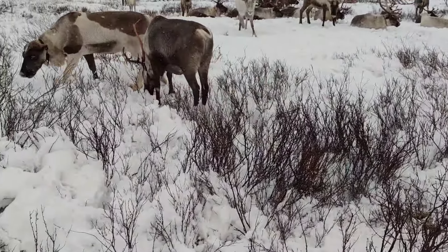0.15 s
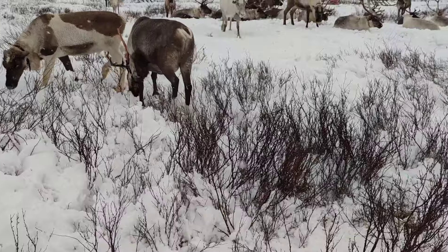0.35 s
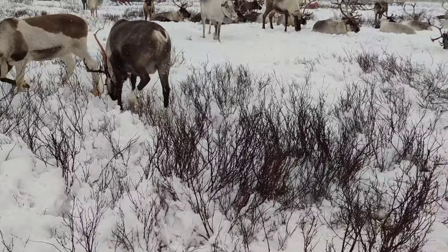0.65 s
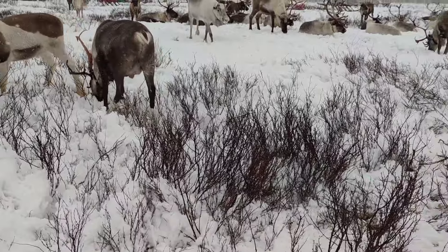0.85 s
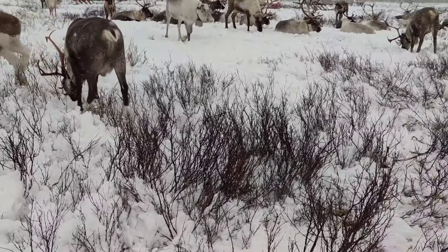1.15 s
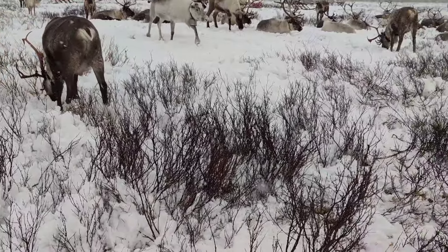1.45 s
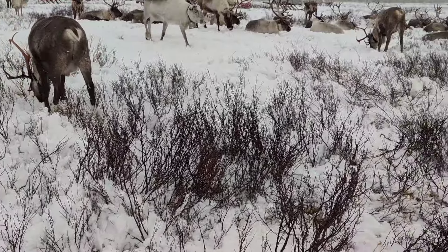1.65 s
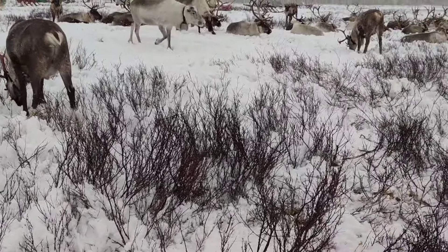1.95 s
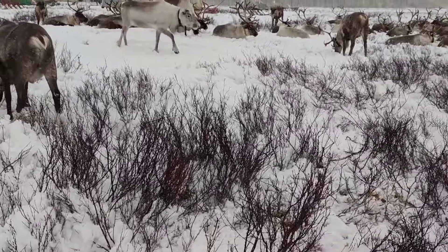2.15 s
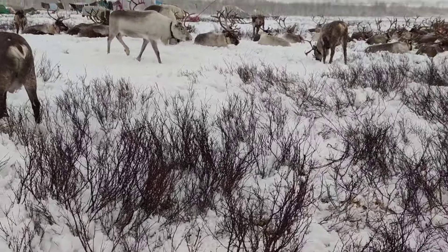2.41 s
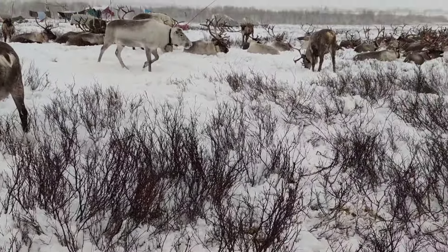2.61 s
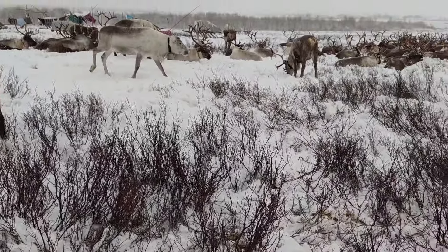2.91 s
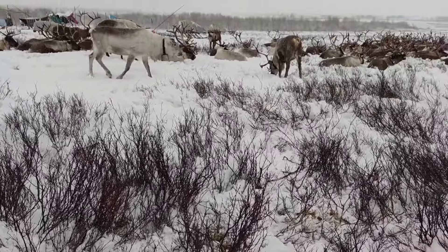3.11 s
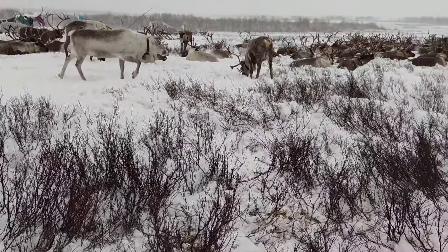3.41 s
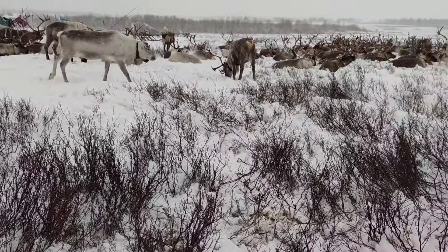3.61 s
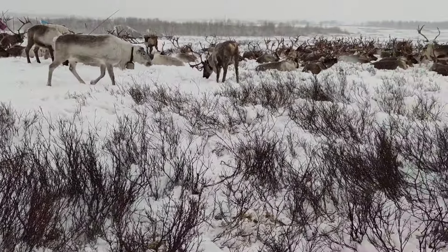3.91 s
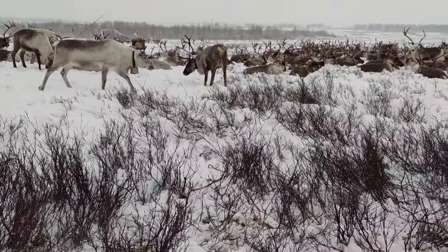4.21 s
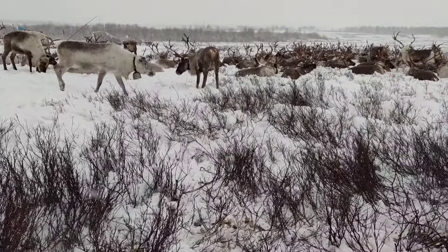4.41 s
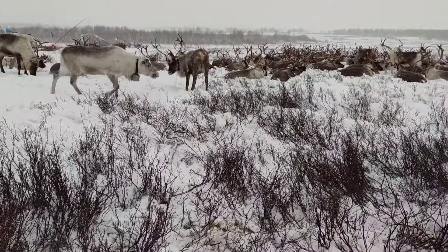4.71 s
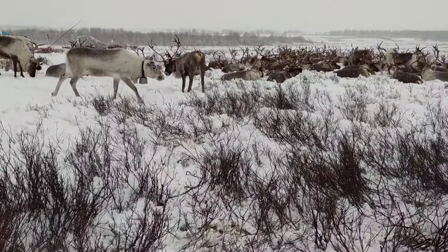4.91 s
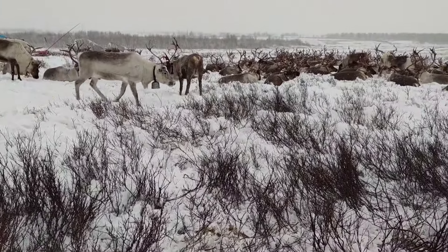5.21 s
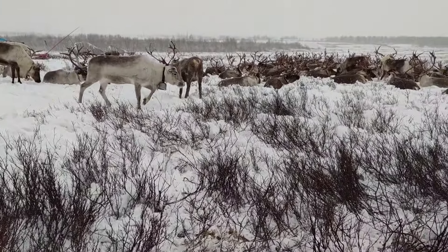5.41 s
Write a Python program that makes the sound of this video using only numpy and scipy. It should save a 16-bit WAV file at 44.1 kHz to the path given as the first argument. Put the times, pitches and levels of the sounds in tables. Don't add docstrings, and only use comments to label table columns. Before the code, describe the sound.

Small animal bells tinkle and a larger bell clanks step by step as wind rumbles into the microphone over crunching snow.

```python
import sys
import numpy as np
from scipy import signal
from scipy.fft import rfft, irfft, next_fast_len
from scipy.io import wavfile
from scipy.ndimage import uniform_filter1d, map_coordinates

SR = 44100
rng = np.random.default_rng(int(sys.argv[2]) if len(sys.argv) > 2 else 0)


def master(y):
    cut = np.clip(np.atleast_2d(y).T, -1, 1)
    pcm = np.round(cut * 32767)
    wavfile.write(sys.argv[1], SR, pcm.astype(np.int16))


def attenuation_scalar(level_db):
    decades = np.asarray(level_db, float) / 20
    return 10 ** decades


N = 244755


def unit(x):
    return x / np.sqrt(np.mean(x ** 2, axis=-1, keepdims=True) + 1e-20)


def curves(rows):
    s, *cols = np.transpose(rows)
    return [np.interp(np.arange(N) / SR, s, c) for c in cols]


def wobble(rate):
    knots = rng.standard_normal((2, 1200))
    coarse = np.arange(0, N + 32, 32)
    smooth = [map_coordinates(k, [coarse * rate / SR]) for k in knots]
    return np.array([np.interp(np.arange(N), coarse, c) for c in smooth])


def coloured(x, points):
    m = 16384
    hz, db = np.transpose(points)
    gain = attenuation_scalar(np.interp(np.log(np.fft.rfftfreq(m, 1 / SR) + 1), np.log(hz), db))
    cepstrum = irfft(np.log(gain + 1e-7), m)
    cepstrum[1:m // 2] *= 2
    cepstrum[m // 2 + 1:] = 0
    response = irfft(np.exp(rfft(cepstrum)), m)
    size = next_fast_len(N + m)
    return irfft(rfft(x, size) * rfft(response, size), size)[..., :N]


def ports(mid_db, pan_db):
    right = 2 * attenuation_scalar(mid_db) / np.sqrt(1 + attenuation_scalar(2 * pan_db))
    return np.array([right * attenuation_scalar(pan_db), right])


def bursts(times, gains, life, shared):
    out = np.zeros((2, N + 2048))
    t = np.arange(2048) / SR
    shape = t / life * np.exp(1 - t / life)
    for s, gain in zip(times, gains.T):
        noise = rng.standard_normal((2, 2048))
        noise[0] = shared * noise[1] + np.sqrt(1 - shared ** 2) * noise[0]
        start = round(s * SR)
        out[:, start:start + 2048] += gain[:, None] * noise * shape
    return out[:, :N]


def bell(blows, pitches, modes, lead_us, sway_db, scatter_db=0):
    out = np.zeros((2, N))
    starts = [round(row[0] * SR) for row in blows] + [N]
    for k, (s, *level_db) in enumerate(blows):
        start = starts[k]
        luck = rng.standard_normal((len(modes), 3))
        for j, (hz, (db, t60, pan_db)) in enumerate(zip(pitches, modes)):
            t = np.arange(min(starts[k + 1] - start, int(t60 * SR))) / SR
            start_db = level_db[-1 if scatter_db else j] + db + scatter_db * luck[j, 0]
            decay = np.log(1000) / t60
            ring = np.exp((2j * np.pi * hz - decay) * t + 2j * luck[j, 1]) * attenuation_scalar(start_db)
            flicker = np.interp(t * 90, np.arange(40), rng.standard_normal(40))
            ring *= np.exp((0.21 + 0.25j) * flicker * hz / 8000)
            ring *= np.minimum(t / 0.0015, 1)
            early = np.exp(2j * np.pi * hz * lead_us[start] * 1e-6)
            left = attenuation_scalar(pan_db + sway_db * luck[j, 2]) * early
            out[:, start:start + len(t)] += [(left * ring).imag, ring.imag]
    return out


def split(db, place):
    angle = np.radians(place)
    return db + 20 * np.log10(np.abs([np.cos(angle), np.sin(angle)]) + 1e-3)


# t/s, strength level/dB, edge-on level/dB as it turns,
# place on the rim/degrees, hum level/dB
LARGE_BLOWS = [(0, -101, -7, 45, -47.5), (0.6404, -50, -18, 14, -57), (0.9916, -50.5, -9.5, 51, -62),
               (1.3397, -42, -35, 15, -63), (1.757, -39, -17, 56, -56.5), (2.104, -40.5, -5.5, 16, -61.5),
               (2.3, -91, -28, 55, -71), (2.521, -59, 6.5, 120, -62), (2.8014, -33.5, 2.5, 66, -59),
               (3.209, -53, -14.5, 76, -61.5), (3.5103, -41.5, -3.5, 18, -61.5),
               (3.887, -41.5, -0.5, 49, -64), (4.167, -42.5, 3, 71, -51.5), (4.58, -60, -9, 44, -60.5),
               (4.9001, -57, 6, 30, -53.5)]
# level/dB at a usual blow, share of strength, share of edge-on,
# drift/(dB per s) as the animal walks across
MODE_ANSWER = [
    (-46.5, 0.998, 0.97, 3),
    (-67.5, 0.74, 0.017, 4),
    (-57, 0.261, 0.32, 0),
    (-57.5, 0.51, 1, -3.5),
    (-44, 0.43, 0.08, 2.5),
    (-46, 0.99, 0.18, 3.5),
    (-40, 0.51, 0.44, -3),
]
# level/dB at f/Hz 4140, 6180, 6320, 6680, 6860
PAIR_MODE_BEAM = [(0, 0, 0, 0, 0), (-15, 7, 4, -4, 0), (0, -5, -3, -6, 4), (-3, 2, 1, 0, 4),
                  (1, -10, -7, 3, 0), (-12, -3, -3, 3, 3), (0, 0, 0, 0, 0), (-2, 5, 14, -7, 3),
                  (-12, 4, -3, -4, 0), (-6, -3, -4, 6, 0), (-2, 4, 7, -2, 0), (-11, 1, 1, -9, -3),
                  (4, -4, 4, 9, 1), (-10, -4, 5, -3, 5), (-10, -11, -7, -8, -7)]
# level/dB at f/Hz 4240, 4260, 8580, 8760
TWIN_MODE_BEAM = [(0, 0, 0, -6), (1, 1, 15, -13), (-4, -3, 25, -3), (1, 6, 7, -6), (1, 12, -1, -7),
                  (-21, -3.5, 10, -15), (0, 0, 0, 0), (-8, -13, -2, -10), (-7.5, -14, 11, -2),
                  (1, -2, -7, 0), (-11, -9.5, 6, -14), (2.5, -6, -4, -16), (-11, -3, 8, -12),
                  (-11, -4, -2, -6), (-5, -11, 10, -16)]
TOP_CLUSTER_BEAM = [-5, -4, 3.5, -1, 3.5, 1, 3, 2.5, -1.5, -1, 5.5, -5.5, 1.5, -5, -6]


def blow_levels():
    usual_db, abreast_s = -47, 2.8
    node_floor = 0.088
    s, strength, edge, place, hum = np.transpose(LARGE_BLOWS)
    answers = []
    for db, by_strength, by_edge, by_time in MODE_ANSWER:
        change_db = by_strength * (strength - usual_db) + by_edge * edge + by_time * (s - abreast_s)
        answers.append(db + change_db)
    second, third, top, *single, pair = answers
    third = third + 20 * np.log10(np.abs(np.cos(np.radians(2 * place))) + node_floor)
    lower, _, middle, _ = np.transpose(TWIN_MODE_BEAM)
    pairs = np.array([*single, *split(pair, place)]) + np.transpose(PAIR_MODE_BEAM)
    singles = [s, hum, strength, second + lower, third + middle, top + TOP_CLUSTER_BEAM]
    return np.transpose(singles), np.transpose([s, *pairs])


# t/s, left port's lead/microseconds
BELL_WALK = [
    (0, 1),
    (5.55, 73),
]
MAIN_HZ = [866, 2340, 4243, 8583]
# level/dB, time to fall 60 dB/s, left-right level/dB
MAIN_MODES = [(2, 2.33, -5), (3, 0.45, -8), (8.5, .11, -3), (0, 0.2, 6)]
PAIR_HZ = [4152, 6183, 6319, 6684, 6862]
# level/dB, time to fall 60 dB/s, left-right level/dB
PAIR_MODES = [(15.3, 0.09, -5), (2.5, 0.18, -16), (1.7, 0.25, -12), (4.7, 0.19, -8), (2, 0.22, -10.5)]
TOP_HZ = [9860, 10225, 12575, 11005, 12905, 11365, 11527, 11770, 12968, 13843, 14176]
# level/dB, time to fall 60 dB/s, left-right level/dB
TOP_MODES = [(-22, 0.1, -8), (-3, 0.063, -11), (-12, 0.09, -21), (8, .07, -17), (-8, 0.09, -24),
             (5, 0.11, -22), (-6, 0.15, -22), (-14, .07, -20), (3, 0.094, -16), (-10, .06, -13),
             (6, .05, -20)]


def large_bell():
    lead_us, = curves(BELL_WALK)
    blows, pairs = blow_levels()
    ringing = bell(blows, MAIN_HZ, MAIN_MODES, lead_us, sway_db=2.2)
    ringing += bell(pairs, PAIR_HZ, PAIR_MODES, lead_us, sway_db=3.2)
    return ringing + bell(blows, TOP_HZ, TOP_MODES, lead_us, sway_db=4.2, scatter_db=4)


TWIN_MODE_HZ = [4268, 8748, 10695, 11216]
# level/dB, time to fall 60 dB/s, left-right level/dB
TWIN_MODES = [(11, 0.094, -1), (7.5, 0.11, -0.5), (11.5, 0.13, -17), (-25, 0.16, -26)]


def twins():
    s, _, _, second, third, top = blow_levels()[0].T
    lower, upper, _, high = np.transpose(TWIN_MODE_BEAM)
    levels = [second - lower + upper, top + high, top + high, 0.5 * third]
    rows = np.transpose([s, *levels])
    return bell(rows, TWIN_MODE_HZ, TWIN_MODES, curves(BELL_WALK)[0], sway_db=-8)


def clank():
    s, top_db = blow_levels()[0].T[[0, -1]]
    gains = attenuation_scalar(top_db + np.array([[2.5], [6]]))
    rattle = bursts(s, gains, life=0.0022, shared=0.46)
    return coloured(rattle, [(1500, 7.4), (4000, 12.8), (9000, 5.3), (15000, 3)])


# t/s, strength level/dB, place on the rim/degrees, top hardness level/dB
SMALL_BLOWS = [(0.031, -54.5, 59, -12), (0.0995, -42.5, 10, -7), (0.363, -73, 44, -8),
               (0.4321, -51, 42, -13), (0.5266, -46.5, 47, -14), (0.599, -52.5, 100, -4.5),
               (1.37, -55.5, 38, -13), (1.474, -51, 39, -15), (1.5495, -46.5, 43, -20), (1.639, -59, 6, -9),
               (1.696, -66, 19.6, -8.5), (1.9257, -42.5, 4.7, -18), (1.982, -44, 12.2, -19),
               (2.099, -74, 45, 0), (3.7832, -51.5, 9.4, -13), (3.9002, -45, 77, -9),
               (4.0854, -55.5, 36, -9), (4.2748, -48, 4, -19.5), (4.4834, -50, 100, -6),
               (4.647, -52, 56, -14), (5.1634, -49, 18, -11), (5.197, -51, 23, -13),
               (5.3243, -44.5, 40, -16), (5.411, -36.5, 4.9, -27)]
# level/dB, place on the rim/degrees
SMALL_HUMS = [(-62, 38), (-56.5, 18), (-70, 27), (-65, 5), (-65, 15), (-62.5, 15), (-68, 75), (-58.5, 21),
              (-63.5, 68), (-64, 10), (-67, 30), (-57.5, 18), (-62.5, 7), (-97, 45), (-77, 35), (-61, 65),
              (-69, 11), (-78, 25), (-69, 20), (-69, 32), (-72, 85), (-74, 63), (-68, 80), (-65, 86)]


def tinkle_levels():
    s, strength, place, hard = np.transpose(SMALL_BLOWS)
    hum_db, hum_place = np.transpose(SMALL_HUMS)
    return np.transpose([s, *split(strength, place), *split(hum_db, hum_place), strength + hard])


SMALL_MAIN_HZ = [7651, 7682, 2986, 2937]
# level/dB, time to fall 60 dB/s, left-right level/dB
SMALL_MODES = [(-2.5, 0.34, 2), (-3.5, 0.39, 3), (1, 0.56, -9), (0, 1.1, -12)]
SMALL_CLUSTER_HZ = [7870, 11447, 11781, 11915, 12085]
# level/dB, time to fall 60 dB/s, left-right level/dB
SMALL_CLUSTER = [(-18, 0.38, -7), (-1, 0.19, -22), (2, 0.22, -22), (-7, 0.17, -12), (1.5, 0.18, -30)]


def small_bell():
    tinkles, still = tinkle_levels(), np.zeros(N)
    ringing = bell(tinkles, SMALL_MAIN_HZ, SMALL_MODES, still, sway_db=5)
    return ringing + bell(tinkles, SMALL_CLUSTER_HZ, SMALL_CLUSTER, still, sway_db=-4, scatter_db=2.5)


def cracks(s, db, low_db, high_db, pan_db):
    low = bursts(s, ports(db + low_db + 7, 0.5 * pan_db), life=0.00066, shared=0.14)
    middle = bursts(s, ports(db + 6.5, pan_db + 6), life=0.00075, shared=0.16)
    high = bursts(s, ports(db + high_db + 6.5, pan_db), life=0.00053, shared=0.67)
    low = coloured(low, [(300, 3), (1000, -1.5), (2400, 4.5), (4000, -2.5), (15000, -90)])
    middle = coloured(middle, [(1200, -10.5), (3300, -9), (4500, -4.5), (8000, -1), (11000, -28)])
    high = coloured(high, [(4000, -38), (9000, 0.5), (15000, -2.5)])
    return low + middle + high


# level/dB over the top cluster, dull level/dB, bright level/dB,
# left-right level/dB
CLAPPER_TICK = (8, -1.5, -14, -19)
# t/s, peak level/dB, bright level/dB, left-right level/dB
TWIG_SNAPS = [(0.1206, -40, -24, -13), (0.56, -40.5, -16.5, -12.5), (0.7, -44, -11, -2),
              (1.8523, -46, -15, 1), (2.301, -40.5, -19, -12), (2.326, -50, -15, -13),
              (2.8604, -45, -14, -11.5), (2.9094, -45.5, -1, -21), (2.9287, -47, -4.5, -17),
              (3.3438, -42.5, -13, -9), (3.4111, -47, -13, -11), (3.483, -45, -7, -8),
              (4.013, -48.5, -15, -16), (4.244, -45, -24, -10), (5.317, -40.5, -23, -17)]
# t/s, peak level/dB, bright level/dB, left-right level/dB
CRUST_BREAKS = [(0.1019, -49, -9, -11.5), (0.14, -40.5, -27, -22), (0.297, -60, -14, 10),
                (0.3159, -46.5, -21.5, 6), (0.858, -59, 0, -14), (0.9527, -45.5, -6, -8),
                (2.1893, -50, -6, -19), (2.36, -50, -29, -7), (2.4082, -42.5, -1, -10),
                (2.4718, -41.5, -12, 12), (3.296, -50.5, -10, 3), (3.367, -42.5, -15, -20),
                (3.441, -45, -13, 12), (3.577, -46.5, -16.5, -18), (4.227, -46, -10, -14),
                (4.4133, -48, -28, -21), (4.4253, -41, -14, -24), (4.4742, -68.5, -4, -22),
                (5.5346, -56, -20, -19)]


def snaps():
    tick_lead_s, twig_dull_db, crust_dull_db = 0.002, -36, -1
    over_db, *parts = CLAPPER_TICK
    ticks = [(abs(row[0] - tick_lead_s), row[-1] + over_db, *parts) for row in blow_levels()[0]]
    twigs = [(s, db, twig_dull_db, high, pan) for s, db, high, pan in TWIG_SNAPS]
    crust = [(s, db, crust_dull_db, high, pan) for s, db, high, pan in CRUST_BREAKS]
    return cracks(*np.transpose(ticks + twigs + crust))


# t/s, peak level/dB, dull level/dB, bright level/dB,
# left-right level/dB
SMALL_SPLINTERS = [(0.36, -44.5, -11, -17.5, -8), (0.414, -46, -23, -20, -11), (0.4424, -43, -7, -12, 0),
                   (0.8774, -49, -15, -16, -14), (0.9226, -45.5, -13, -7, -19),
                   (1.3254, -56, -22, -19, -14.5), (1.6702, -48, -5, -19, 0), (1.69, -52.5, 3, -13, -1),
                   (2.3487, -44, -13, -23, -11.0), (2.4202, -45, -6, -19, -1),
                   (2.484, -44, -13, -16, -14.5), (2.4947, -47, -5, -5, -5), (2.6683, -46.5, 0, -10, -8),
                   (2.6898, -45.5, -8, -22, -12.0), (2.9566, -43, -19, -9, -2), (3.1185, -57, -7, -5, -7),
                   (3.308, -44.5, -8, -6.5, -9), (3.4307, -51, -3.5, -18, -10), (3.6775, -56, 0, -16, 0),
                   (3.845, -49, -19.5, -2, -14), (4.0422, -47.5, -5, -23, -12.5),
                   (4.2764, -45, -7, -14, -4), (4.29, -45, -1, -18, -4), (4.333, -49, 3, -15, 4),
                   (4.5095, -46.5, -8, 0, -22), (4.6828, -56, -12, -18.5, -15), (4.9, -35, -25, -26, -13),
                   (5.18, -52, -19, -2, 2), (5.241, -49, -16, -27, -8), (5.4096, -40, -11, -23, -8),
                   (5.4685, -40.5, -4, -21, -5), (5.5004, -44.5, 1.5, -30, -5)]
# peak, dull, bright and left-right level/dB
SPLINTER_OFFSETS = [-5, 2, 0, 2]


def splinters():
    s, *parts = np.transpose(SMALL_SPLINTERS)
    parts = parts + np.array(SPLINTER_OFFSETS)[:, None]
    return through_ports(cracks(s, *parts))


def grains(rate, spread_db, life, colour):
    chance, size, noise = rng.random(N), rng.exponential(size=N), rng.standard_normal((2, N))
    starts = (chance < rate / SR) * attenuation_scalar(np.minimum(spread_db * size, 3 * spread_db))
    envelope = signal.lfilter([1], [1, -np.exp(-1 / (life * SR))], starts)
    return unit(coloured(envelope * (0.083 * noise[1] + 4.3 * noise), colour))


# t/s, level/dB
SNOW_CRUNCH = [(0.0, -48), (0.07, -105), (0.14, -72.5), (0.67, -68), (1.18, -78), (1.81, -67),
               (2.21, -71.5), (2.55, -65.5), (2.76, -73), (2.9, -65.5), (3.81, -73), (4.11, -71.5),
               (4.19, -62), (4.85, -79.5), (5.1, -78), (5.5, -67.5)]


def crunch():
    level_db, = curves(SNOW_CRUNCH)
    dull = grains(rate=400, spread_db=-1.5, life=0.0013,
                  colour=[(600, -3), (2500, -2.5), (6000, -8), (9000, -2.5), (15000, -17)])
    bright = grains(rate=79, spread_db=1.5, life=0.0006,
                    colour=[(3000, -31.5), (7000, 9), (12000, 4), (15000, 7)])
    clumps_db = 2.6 * wobble(18)[0]
    return attenuation_scalar(level_db + 7 + clumps_db) * (dull + attenuation_scalar(-10) * bright)


# t/s, peak level/dB, time to swell by 10 dB/s (negative: bursts in, then fades by 10 dB in that time), #
# left-right level/dB, flutter level/dB against the rumble
WIND_GUSTS = [(0.599, -22, 0.28, -10.5, -15), (0.76, -23.5, 0.25, -8, -12.5), (0.902, -22, 0.1, -8.5, -9.5),
              (1.044, -27.5, 0.05, -12, -17), (1.242, -23.5, 0.13, -8.5, -9.5),
              (1.433, -26, 0.04, -21, -17.5), (1.679, -23, 0.26, -3.5, -17), (1.818, -25, 0.12, -13, -15.5),
              (2.56, -24.5, 0.1, -23, -6.5), (2.731, -15, 0.02, -12, -7.5),
              (2.924, -19, 0.1464, -5.5, -9.5), (3.185, -22, -0.15, 8, -27), (3.291, -19, 0.1241, -10, -9),
              (3.51, -23, 0.0244, -11, -3), (3.645, -25, 0.15, -6, -9.5), (3.832, -25, 0.19, -19, -18),
              (3.934, -22.5, 0.05, -30, -8.5), (4.222, -22, 0.17, -7.5, -18), (4.351, -27, 0.25, -4, -8.5),
              (4.584, -26, 0.26, -23, -7), (4.786, -29, 0.05, 0, -4.5), (4.985, -26.5, 0.2, 4, -9.5),
              (5.424, -21, 0.07, -20, -15.5), (5.508, -32, -0.3, -9, -8.5)]
# t/s, level/dB, left-right level/dB
STEADY_WIND = [(0.0, -16, -11.5), (0.331, -19.5, -8.5), (0.44, -30.5, 9), (0.97, -34, 6.5),
               (1.34, -37.5, -9), (1.9, -37.5, -9), (2.23, -34, -9.5), (2.36, -29, -12.5), (3.1, -32, -11),
               (3.71, -36, -18), (4.4, -34, -4), (4.68, -29.5, -25), (5.12, -27.5, -18), (5.31, -33.5, -7),
               (5.55, -35, 0)]


def wind_strength():
    fall_over_rise, gust_flutter_grows = 0.25, 1.66
    flutter_db, flutter_grows = -51, 1.75
    t = np.arange(0, N / SR + 0.01, 0.004)
    s, db, swell, pan, under = np.transpose(WIND_GUSTS)[:, :, None]
    drop_db = 10 * np.maximum((s - t) / swell, (t - s) / (fall_over_rise * swell))
    at, steady_db, steady_pan = np.transpose(STEADY_WIND)
    steady_db, steady_pan = np.interp(t, at, steady_db), np.interp(t, at, steady_pan)
    gust_flutter_db = db + under - gust_flutter_grows * drop_db
    steady_flutter_db = flutter_db + flutter_grows * (steady_db + 31)
    rumble = attenuation_scalar(2 * np.vstack([db - drop_db, steady_db]))
    flutter = attenuation_scalar(2 * np.vstack([gust_flutter_db, steady_flutter_db]))
    rumble_sum, flutter_sum = rumble.sum(axis=0), flutter.sum(axis=0)
    pan_db = (np.sum(rumble[:-1] * pan, axis=0) + rumble[-1] * steady_pan) / rumble_sum
    return curves(np.transpose([t, 10 * np.log10(rumble_sum), 10 * np.log10(flutter_sum), pan_db]))


# t/s, peak level/dB, left-right level/dB
WIND_PUFFS = [(0.006, -16, -32), (0.014, -12.5, -34), (0.056, -21, -23), (0.101, -14, -26),
              (0.15, -17, -24), (0.197, -13.5, -18.5), (0.228, -14.5, -13.5), (0.265, -23, -22),
              (0.288, -17.5, -30), (0.3, -19, -22), (0.313, -17.5, -29), (0.336, -22.5, -21),
              (0.493, -29, -18), (0.576, -31, -26), (0.649, -28, -7.5), (0.739, -34.5, -26),
              (0.846, -41, 0), (0.872, -33, -9), (1.014, -36.5, -9), (1.213, -45.5, 2), (1.411, -37, -25),
              (1.606, -29.5, -30), (1.672, -35.5, -17), (2.319, -37.5, -28), (2.514, -30.5, -23),
              (2.71, -37, -15.0), (2.727, -25, -24.0), (2.894, -33.5, -18), (2.915, -38.5, -6),
              (3.163, -31.5, 16), (3.256, -30.5, -1.5), (3.277, -25, -1), (3.361, -33.5, -5),
              (3.482, -28, -15), (3.572, -39, 13.0), (3.643, -38.5, -27), (3.915, -34, -31),
              (3.931, -38, -30), (4.037, -38, -22), (4.159, -39, 16), (4.207, -25, -19), (4.256, -32, -23),
              (4.287, -23, -12), (4.346, -29, -21.0), (4.739, -40, -21), (4.76, -34.5, -27),
              (4.89, -33, -21), (4.957, -36, -5.5), (5.098, -38, -25), (5.129, -37, -11), (5.236, -36, -22),
              (5.377, -38.5, -21), (5.421, -28.5, -26), (5.48, -28, -13)]
# f/Hz, level/dB
RUMBLE_COLOUR = [(8, -8), (20, 2), (45, -1), (90, -5.5), (160, -12), (300, -29), (600, -49), (2000, -120)]
# f/Hz, level/dB
FLUTTER_COLOUR = [(60, -27), (150, -0.5), (250, -2), (400, -10.5), (700, -20.5), (1200, -36.5), (2500, -52),
                  (8000, -110)]
# f/Hz, level/dB
PUFF_COLOUR = [(40, -14.5), (120, 4), (400, -7), (800, -19), (1500, -36), (3000, -49), (5000, -67),
               (15000, -120)]


def wind():
    rumble_db, flutter_db, pan_db = wind_strength()
    eddy, quick = wobble(26), wobble(70)
    rumble = unit(attenuation_scalar(2.6 * eddy) * coloured(rng.standard_normal((2, N)), RUMBLE_COLOUR))
    flutter_noise = coloured(rng.standard_normal((2, N)), FLUTTER_COLOUR)
    flutter = unit(attenuation_scalar(4 * eddy + 3.13 * quick) * flutter_noise)
    s, db, side_db = np.transpose(WIND_PUFFS)
    puffs = bursts(np.abs(s - 0.002), ports(db + 19, side_db), life=0.004, shared=0)
    rumble = ports(rumble_db, 0.69 * pan_db - 1.5) * rumble
    flutter = ports(flutter_db + 0.5, 1.74 * pan_db) * flutter
    return rumble + flutter + coloured(puffs, PUFF_COLOUR)


# t/s, then level/dB of each of three modes
FAR_BELL_BLOWS = [
    (.19, -66, -100, -100),
    (5.19, -100, -78, -72),
    (5.38, -100, -66.5, -85),
    (5.42, -100, -75, -71),
]
FAR_BELL_HZ = [4230, 4888, 5650]
# level/dB, time to fall 60 dB/s, left-right level/dB
FAR_MODES = [(0, 0.41, 4), (0, 1, -2), (0, .7, 1)]


def far_bells():
    return bell(FAR_BELL_BLOWS, FAR_BELL_HZ, FAR_MODES, np.zeros(N), sway_db=7)


PORT_HISS = [-60.5, -68.5]


def hiss():
    drift = attenuation_scalar(2.8 * wobble(4.7))
    return attenuation_scalar(PORT_HISS)[:, None] * drift * rng.standard_normal((2, N))


# f/Hz, level/dB
LEFT_PORT = [(500, 11.5), (1500, 2), (3500, -3), (5500, -7.5), (7000, -5), (7800, -2), (9000, -9),
             (11000, -9), (14200, -11), (14600, -37.5)]
# f/Hz, level/dB
RIGHT_PORT = [(500, -11), (1500, -1.5), (3500, 0), (5300, 0.5), (6600, 8), (7500, 0.5), (8300, -11.5),
              (9800, -9.5), (12000, -1.5), (14200, 0.5), (14600, -45.5)]


def through_ports(x):
    return np.array([coloured(x[0], LEFT_PORT), coloured(x[1], RIGHT_PORT)])


def scene():
    broad = hiss() + snaps() + clank() + crunch() * attenuation_scalar([[-5], [2.5]])
    near = through_ports(broad) + large_bell() + small_bell() + wind()
    return near + far_bells() + twins() + splinters()


# line from f/Hz, line to f/Hz, hidden from f/Hz,
# hidden to f/Hz, depth level/dB
HIDING_BANDS = [
    (7400, 7900, 8000, 10800, 23),
    (6100, 6950, 7900, 10300, 30),
]


def masked(x):
    deeper_db_per_khz = 5.5
    hz, _, z = signal.stft(x, SR, nperseg=1024)
    power = np.abs(z) ** 2
    band = uniform_filter1d(power, size=9, axis=1)
    for low, high, start, stop, depth_db in HIDING_BANDS:
        line = power[:, (hz > low) & (hz < high)].max(axis=1, keepdims=True)
        line = signal.lfilter([0.2, 0.3], [1, -0.5], line, axis=2)
        hidden = (hz > start) & (hz < stop)
        reach_db = depth_db + deeper_db_per_khz * (hz[hidden, None] - start) / 1000
        z[:, hidden] *= band[:, hidden] > line * attenuation_scalar(-2 * reach_db)
    return signal.istft(z, SR, nperseg=1024)[1][:, :N]


def band_limit(x):
    return signal.sosfilt(signal.butter(12, 15020, fs=SR, output="sos"), x)


def record(dry):
    top, hard = 0.93, 8
    clipped = dry / (1 + np.abs(dry / top) ** hard) ** (1 / hard)
    return band_limit(masked(clipped))


dry = scene()
out = record(dry)
master(out)
```